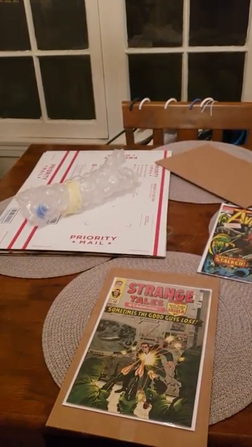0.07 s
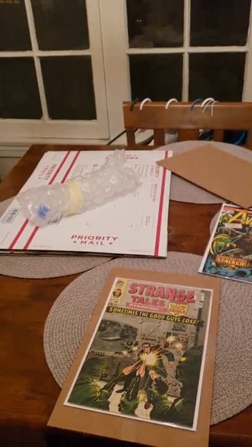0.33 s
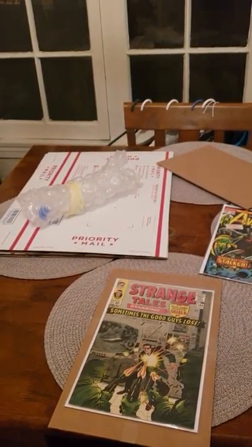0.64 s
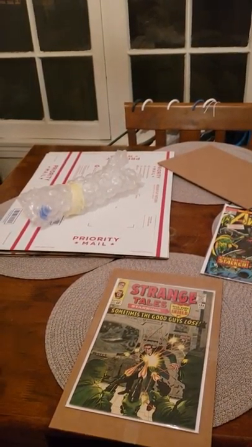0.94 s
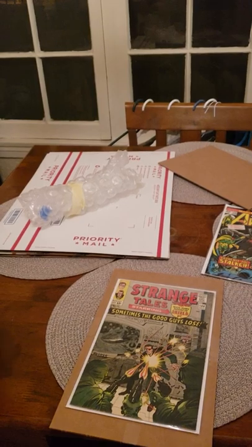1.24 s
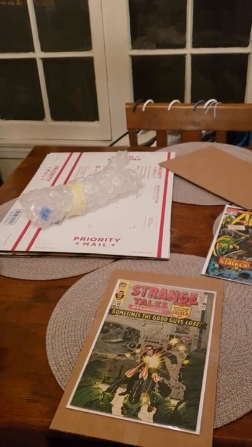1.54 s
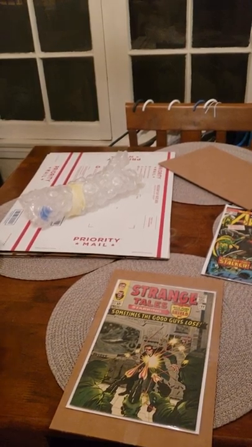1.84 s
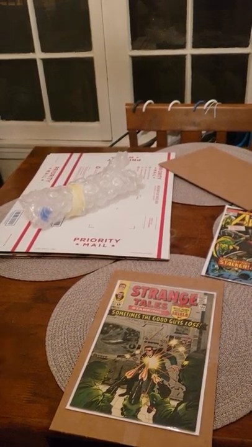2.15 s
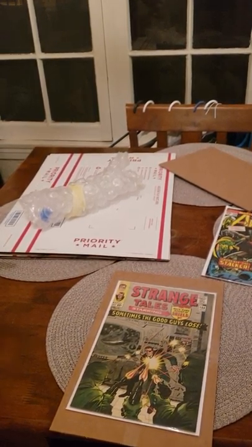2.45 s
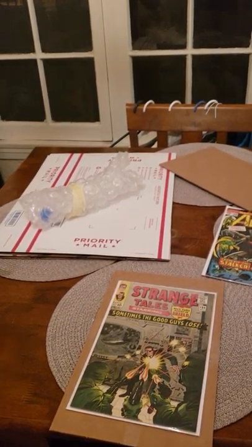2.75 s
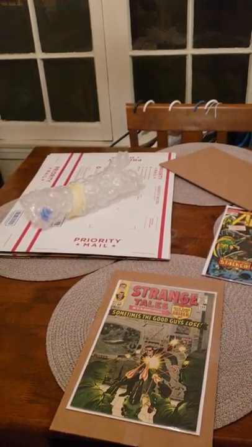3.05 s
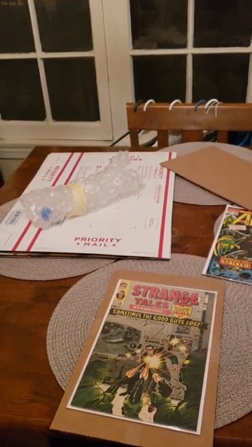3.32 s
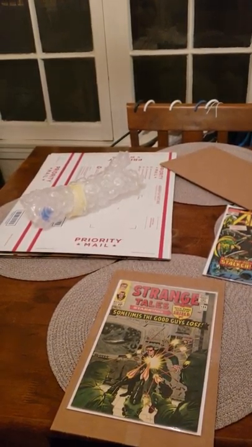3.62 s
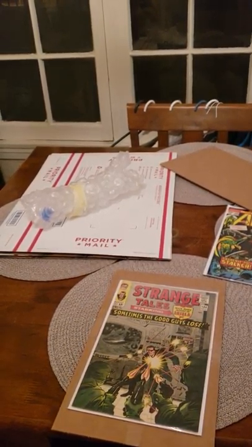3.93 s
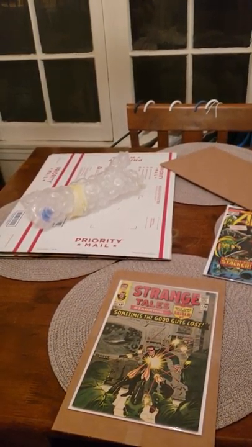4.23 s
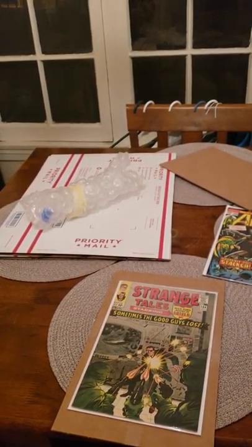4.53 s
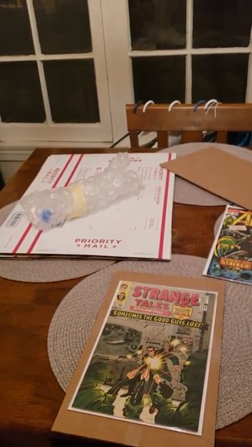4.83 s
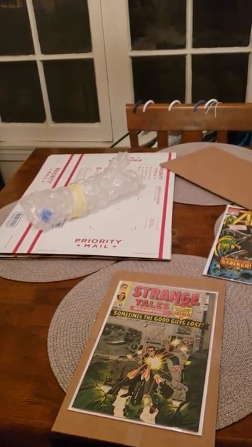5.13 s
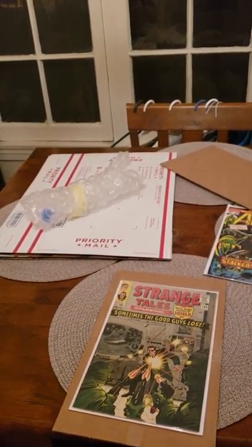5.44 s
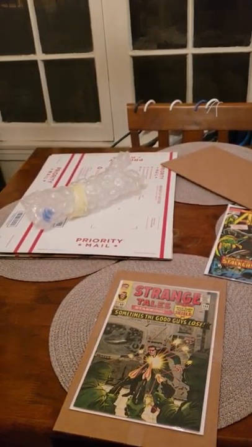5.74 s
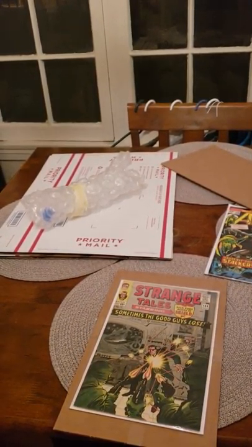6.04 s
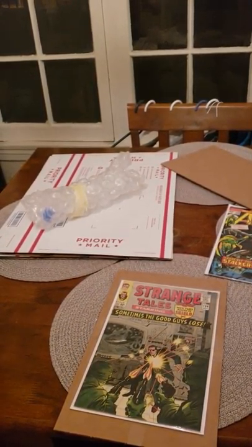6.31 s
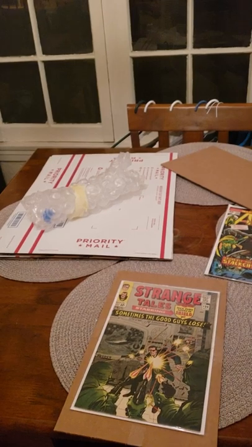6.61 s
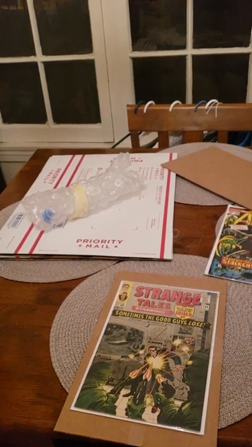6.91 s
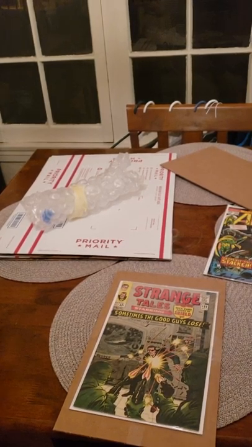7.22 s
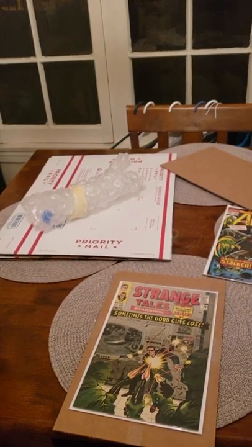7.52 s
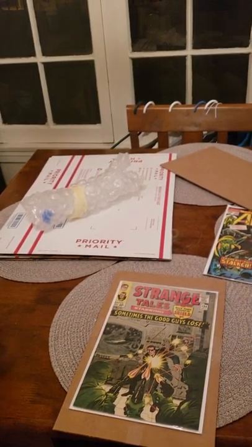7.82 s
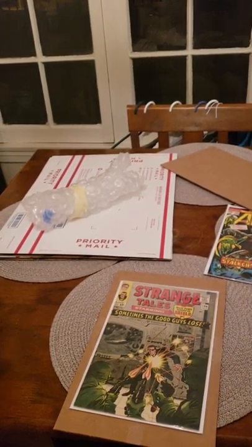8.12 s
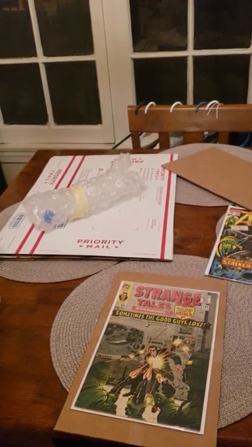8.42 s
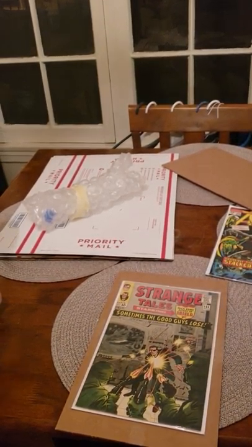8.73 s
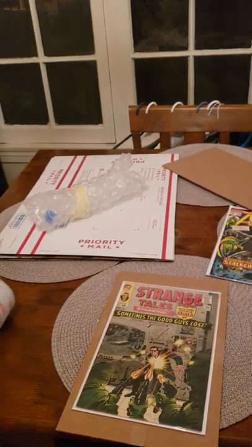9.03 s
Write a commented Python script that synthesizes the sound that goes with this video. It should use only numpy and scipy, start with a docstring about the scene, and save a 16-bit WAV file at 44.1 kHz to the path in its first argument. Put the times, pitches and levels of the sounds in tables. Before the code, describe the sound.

Sharp plastic crackles, soft cardboard knocks and short rips of adhesive tape come from slightly right as a parcel is packed in a small room. The crinkling grows busier, the tape gives a tiny squeak, and one hard pull stands out just past the middle. Afterwards the work dies down to gentle rubbing and a few small snaps. A faint appliance hum and low room noise lie underneath.

```python
"""Taping a parcel at a table in a small, fairly live room, the work a little right of a stereo microphone.
A faint appliance hum and low room noise are there from the start. The tape comes off the roll in short
stick-slip rasps; hands rub over plastic, roll and cardboard bump softly, and the stiff film snaps and
crinkles as it buckles. Past four seconds the taut tape squeaks, and near six comes the hardest pull.
After seven seconds only light strokes and a few small snaps are left over the hum."""
import sys
import numpy as np
from scipy import signal
from scipy.fft import rfft, irfft
from scipy.io import wavfile

SR = 44100
rng = np.random.default_rng(int(sys.argv[2]) if len(sys.argv) > 2 else 0)


def materialize(psi):
    """Save the field psi as 16-bit PCM at rate SR to the path in sys.argv[1].

    A 1-D psi becomes a single channel; in a 2-D psi each row is a channel.
    """
    bounded = np.clip(np.atleast_2d(psi).T, -1, 1)
    quanta = np.round(bounded * 32767).astype(np.int16)
    wavfile.write(sys.argv[1], SR, quanta)


N = 408434
TIME = np.arange(N) / SR

# Low room noise, and a deep thrum under it. Each row: time in seconds, relative level in dB.
RUMBLE_LEVEL = [(0, -63), (.2, -66), (.5, -63), (1.15, -72), (1.8, -62), (2.8, -63), (3.2, -59.5),
                (5.2, -56.5), (6.1, -62), (6.8, -65), (8.4, -60.5), (9.26, -60.5)]
THRUM_LEVEL = [(0, -81), (.38, -62), (.7, -82), (1.4, -80), (2.3, -65), (2.8, -76), (3.8, -64), (4.75, -66),
               (5.05, -57), (5.6, -73), (6.25, -79), (6.55, -64), (6.8, -74), (9.26, -72)]
# Colour of the room noise and of the microphone's hiss. Each row: frequency in Hz, relative level in dB.
RUMBLE_SPECTRUM = [(20, -5), (45, -10.5), (85, -10), (130, 2), (190, -10), (280, -5), (370, 0), (470, -7),
                   (700, -20), (1200, -35), (3000, -40.5)]
HISS_SPECTRUM = [(100, -4.5), (1000, 0), (2000, -4.5), (2900, 2.5), (3500, -5), (5200, 7), (7500, -2),
                 (9500, -9), (11700, 3), (14000, -6), (16000, -8.5)]
# The appliance in the background. Each row: frequency in Hz, level in dB.
HUM_TONES = [(119.5, -74), (366, -74.5)]

# Tape coming off the roll. Each row: start in seconds, length in seconds, level in dB,
# top-octave lift in dB, pitch of the strip in Hz.
TAPE_PULLS = [(0, .012, -39, -1, 5110), (.2795, .013, -18, 6.5, 2940), (.294, .045, -31.5, -3, 2920),
              (1.775, .04, -34, -.5, 5160), (1.99, .012, -31, 2.5, 4940), (3.505, .035, -44, 9, 2800),
              (4.241, .011, -27.5, 0, 3770), (5.053, .035, -35, 4, 5100), (5.864, .034, -19, -.5, 5150),
              (5.896, .022, -14.5, .5, 4850), (5.916, .027, -11.7, 2.5, 3400),
              (5.941, .038, -24.5, 5.5, 4970), (5.974, .045, -39.5, 4, 2800), (6.052, .035, -42, -8, 2670),
              (6.274, .028, -36, 9, 2500), (6.836, .02, -36, 1, 4930), (7.027, .014, -40, -6, 5040)]
# Colour of the peeling strip. Each row: frequency in Hz, relative level in dB.
PEEL_SPECTRUM = [(100, -28), (300, -17), (800, -12.5), (1400, -11.5), (2100, -4), (3000, -3.5),
                 (5300, -2.5), (7200, -8.5), (9000, -4), (12000, -2), (15500, -0.5)]
# Hands passing over the film. Each row: start in seconds, length in seconds, relative level in dB.
HAND_STROKES = [(0, .06, -53), (.13, .5, -65), (1.27, .2, -66), (1.53, .19, -61.5), (1.8, .24, -43.5),
                (2.05, .1, -59), (2.41, .28, -53.5), (2.97, .34, -53.5), (3.31, .46, -50), (3.86, .12, -62),
                (4.07, .13, -58), (4.47, .53, -52.5), (5.06, .2, -47), (5.33, .53, -55.5), (5.98, .07, -43),
                (6.32, .22, -50), (6.79, .4, -62), (7.46, .26, -67), (7.82, .1, -69), (8.1, .18, -61),
                (8.3, .21, -55.5), (8.73, .1, -69), (8.9, .22, -64)]
# Colour of the rubbing. Each row: frequency in Hz, relative level in dB.
RUB_SPECTRUM = [(200, -24), (1200, -8), (2000, -8), (2800, 0), (3600, -6), (5200, 1), (7500, -7.5),
                (10000, -5.5), (15000, -5.5)]
# Knocks and shoves of roll and box. Each row: start in seconds, level in dB, pitch of the hollow in Hz,
# ring of the hollow in dB.
BOX_BUMPS = [(.079, -56.5, 370, 13), (.289, -34.5, 320, 20), (.317, -37, 160, 12), (.333, -45.5, 840, 5),
             (.871, -50.5, 900, -12), (1.939, -50.5, 300, 2), (1.989, -48, 700, 6), (2.055, -50, 500, -1),
             (2.329, -35, 1000, 5), (2.36, -46, 650, 6), (3.47, -55, 650, 7), (4.32, -49, 600, 20),
             (4.352, -43.5, 540, 20), (4.6, -52, 150, 15), (5.014, -43.5, 130, 12), (5.042, -46.5, 650, 13),
             (5.158, -45.5, 550, 6), (5.412, -46, 700, 10.5), (5.5, -51, 600, 10), (5.876, -43.5, 481, 9.5),
             (5.938, -38, 330, 10.5), (6.175, -55, 230, 15), (6.427, -47.5, 300, 0), (6.464, -40, 800, 3),
             (6.595, -48, 450, -13), (6.98, -50, 400, -15), (7.015, -54, 1310, 12)]
# Colour of knocked cardboard. Each row: frequency in Hz, relative level in dB.
CARDBOARD_SPECTRUM = [(40, -13.5), (110, 3), (300, 2.5), (700, -6), (1400, -8), (2200, -5.5), (4000, -24.5),
                      (10000, -42.5)]
# Clear snaps of buckling film. Each row: start in seconds, relative energy in dB,
# tilt from flex towards tick in dB, pitch of the flex in Hz.
CREASE_SNAPS = [(.158, -18, 8, 5300), (.2875, 5, 4.5, 2940), (.3236, -2, 6, 2920), (.3379, 0, 2, 3000),
                (.6996, -31, -8, 5200), (.8494, -23.5, 5, 2750), (.8546, -19.5, -12, 5200),
                (1.598, -25, -4, 5360), (1.6848, -14, 2, 6000), (1.7045, -6.5, 5.5, 5300),
                (1.7685, -4.5, 7, 2750), (1.7973, -7.5, 5, 4900), (1.923, -10, 0, 5750),
                (1.9858, -5.5, 5.5, 2900), (1.9921, -4, 11, 5000), (2.1742, -24, -9, 2800),
                (2.3071, -6.5, 2, 4870), (2.3133, -1, 6, 5200), (2.5848, -25, -15, 2800),
                (2.624, -23.5, 4, 5630), (2.6806, -17, -14, 2800), (2.7017, -21, -10, 3000),
                (3.0514, -18, -15, 2750), (3.1944, -18, -14, 2800), (3.2773, -15.5, -15, 2750),
                (3.3235, -20, -16, 4800), (3.3508, -6.5, 5, 3000), (3.429, -14, 3, 5300),
                (3.4517, -18, -4, 2900), (3.4731, 2.5, -1, 2800), (3.5067, 1, -2, 2900),
                (3.5145, 0, -3, 5100), (3.5344, -10, 5, 5500), (3.5636, 4.5, 4, 2720), (3.58, -1, 1, 5140),
                (3.6147, -6, 2, 2800), (3.644, 1.5, 5, 2800), (3.683, -6, 10, 3000),
                (3.7434, -8.5, 9, 4900), (3.749, -5, 2.5, 2830), (3.777, -18, -15, 2800),
                (3.956, -23.5, 7.5, 3100), (4.1325, -9, 5, 5500), (4.1847, -15.5, 3, 3000),
                (4.2106, -17.5, -11, 2800), (4.2215, -8, -11, 2900), (4.256, -11, -11, 2800),
                (4.2918, -10.5, -4, 4830), (4.3075, -7, -9, 2750), (4.3568, -13, -7, 2800),
                (4.4978, -20.5, -15, 3000), (4.5261, -10.5, -9, 2800), (4.61, -18.5, -14, 5240),
                (4.7063, -20, -3, 2600), (4.782, -8.5, 3, 5400), (4.7905, -5, 4, 5700),
                (4.891, -7, -10, 4900), (4.9111, -2, 2, 4800), (4.9559, -9.5, -4, 5000),
                (4.9847, -15.5, -18, 4000), (5.0405, -1, -2, 5000), (5.0495, -3, 1, 4950),
                (5.0636, 2.5, -1, 6050), (5.078, -2, 7, 5150), (5.09, -1, 4, 5200), (5.159, -3, 6, 5000),
                (5.2011, -10, -1, 5400), (5.2185, -6.5, .6, 5500), (5.3732, -13, -5.5, 5400),
                (5.4057, -15.5, .6, 2900), (5.4161, -4, -4, 3050), (5.469, -6.5, -12.5, 3700),
                (5.4945, -5, -1, 5300), (5.5038, 2, -4, 3340), (5.5618, -13.5, 13.5, 4400),
                (5.6204, -15, -21, 3780), (5.8212, -23, -12, 2500), (5.8779, 9.5, 0, 5500),
                (5.9883, -3.5, 11, 3700), (6.0906, -10.5, -4, 2300), (6.162, -8, 1, 5200),
                (6.18, -.5, 0, 4580), (6.2741, -6, 9, 5400), (6.295, -6, 2, 5400), (6.352, -11.5, 7, 2470),
                (6.3961, -6.5, -4, 4830), (6.4581, -13, -2, 5500), (6.5445, -10, 0, 5500),
                (6.603, -9.5, -2, 3000), (6.8284, -26, 1, 5900), (6.8435, -3, -6, 5200),
                (6.8561, -6, -6, 4500), (6.8829, -4, 3, 5370), (6.973, -20, -2, 5300),
                (7.0151, -14, -3.5, 5300), (7.0407, -9.5, -5, 4930), (8.1763, -22.5, 0, 5300),
                (8.2076, -17.5, -2, 5000), (8.5011, -22.5, -4, 2800), (8.7448, -27, -3, 3000),
                (8.9602, -26, -6, 5000), (9.0066, -24, -5, 4800)]
# Colour of a snap's ringing flex and its bright tick. Each row: frequency in Hz, relative level in dB.
FLEX_SPECTRUM = [(100, -30), (500, -16.5), (1300, -16), (2000, -7), (2800, 1.5), (3900, -2), (5400, -1),
                 (7000, -9), (10000, -20), (16000, -30)]
TICK_SPECTRUM = [(100, -44.5), (2500, -29), (6500, -11), (8500, -5), (11000, 1), (15000, 1), (17000, -7)]
# Taut tape squeaking. Each row: start in seconds, length in seconds, level in dB, first pitch in Hz,
# last pitch in Hz, octave over fundamental in dB.
TAPE_SQUEAKS = [(4.241, 0.0128, -25.5, 2180, 1860, 0), (4.26, 0.019, -45, 2140, 2060, -18),
                (4.301, .009, -31.5, 2570, 2770, -11)]

# How long the room rings. Each row: frequency in Hz, seconds to fall by 60 dB.
ROOM_DECAY = [(100, .5), (500, 0.53), (2000, 0.3952), (5000, 0.355), (10000, 0.38), (16000, 0.08)]
# Colour of the reflections at the microphone. Each row: frequency in Hz, gain in dB.
ROOM_SPECTRUM = [(100, -3.5), (1000, 2.5), (2800, -3), (5200, 2), (7500, -1.5), (11000, -4.5), (16000, -1)]
# Direct sound at the two microphone ports. Each row: frequency in Hz, left minus right in dB.
PORT_BALANCE = [(200, 0.5), (1500, -1), (2900, -3.5), (5000, -4.5), (7500, -2), (11000, -2), (15000, 1.5)]

STROKE_ATTACK_S, STROKE_RELEASE_S = .035, .05


def from_db(db):
    """Decibels to gain."""
    return 10 ** (np.asarray(db) / 20)


def rms_one(x):
    """Scale to rms 1."""
    return x / np.sqrt(np.mean(x ** 2) + 1e-20)


def energy_one(x):
    """Scale to energy 1 per channel."""
    return rms_one(x) / np.sqrt(x.shape[-1])


def at_hz(points, hz):
    """Read a table on a log-frequency axis."""
    f, value = np.transpose(points)
    return np.interp(np.log(np.maximum(hz, 1)), np.log(f), value)


def in_time(rows):
    """Read a curve at every sample."""
    return np.interp(TIME, *np.transpose(rows))


def add(out, start_s, sound):
    """Mix a sound in at a time."""
    at = max(round(start_s * SR), 0)
    out[..., at:at + sound.shape[-1]] += sound[..., :max(N - at, 0)]


def response(spectrum, size=2048):
    """Causal (minimum-phase) impulse response of a spectrum."""
    hz = np.arange(size // 2 + 1) * SR / size
    cepstrum = irfft(np.log(from_db(at_hz(spectrum, hz))))
    cepstrum[1:size // 2] *= 2
    cepstrum[size // 2 + 1:] = 0
    return irfft(np.exp(rfft(cepstrum)))[:size // 2]


def through(x, impulse):
    """Filter both channels with an impulse response."""
    return signal.fftconvolve(x, np.atleast_2d(impulse), axes=-1)[:, :x.shape[-1]]


def resonance(x, hz, width_hz):
    """Two-pole resonance with gain 1 at its peak."""
    r = np.exp(-np.pi * width_hz / SR)
    poles = [1, -2 * r * np.cos(2 * np.pi * hz / SR), r * r]
    return signal.lfilter(np.array([1, 0, -1]) * (1 - r * r) / 2, poles, x)


def stereo_noise(length, alike):
    """White noise whose two channels have the correlation `alike`."""
    mid, side = rng.standard_normal((2, length))
    return np.sqrt(1 + alike) * mid + np.sqrt(1 - alike) * np.array([side, -side])


def grains(length, per_s, spread_db, decay_s):
    """Amplitude of a run of uneven grains, each dying quickly."""
    onsets = rng.random(length) < per_s / SR
    sizes = onsets * from_db(spread_db * np.clip(rng.standard_normal(length), -2, 2))
    return np.sqrt(signal.lfilter([1], [1, -np.exp(-2 / (decay_s * SR))], sizes ** 2 + 1e-12))


def room_tone(thrum_hz=58, thrum_width_hz=50, thrum_trim_db=-2, hiss_db=-74.5):
    """Behind the work: low room noise, a deep thrum, microphone hiss and the appliance's steady hum."""
    rumble = through(stereo_noise(N, alike=.94), response(RUMBLE_SPECTRUM, size=8192))
    rumble = from_db(in_time(RUMBLE_LEVEL)) * rms_one(rumble)
    thrum = stereo_noise(N, alike=1)
    for _ in range(2):
        thrum = resonance(thrum, thrum_hz, thrum_width_hz)
    thrum = from_db(in_time(THRUM_LEVEL) + thrum_trim_db) * rms_one(thrum)
    hiss = from_db(hiss_db) * rms_one(through(stereo_noise(N, alike=.1), response(HISS_SPECTRUM)))
    hum = sum(from_db(db) * np.sqrt(2) * np.sin(2 * np.pi * (hz * TIME + rng.random()))
              for hz, db in HUM_TONES)
    return rumble + thrum + hiss + hum


def tape_pulls(slips_per_s=1150, middling_db=-32, doubling_db=22, release_s=.002, ring_db=6):
    """Glue lets go in stick-slip jerks that shake the taut strip, whose free length sets its pitch."""
    out, t = np.zeros((2, N)), np.arange(SR // 10) / SR
    strip = response(PEEL_SPECTRUM)
    top_octave = signal.butter(1, 8000, "high", fs=SR)
    for start_s, length_s, db, top_db, hz in TAPE_PULLS:
        per_s = slips_per_s * 2 ** ((db - middling_db) / doubling_db)   # a harder pull slips faster
        noise = stereo_noise(len(t), alike=.55)
        jerks = noise * (grains(len(t), per_s, spread_db=2.4, decay_s=.00021) + .08)
        rasp = through(jerks, strip)
        lift = (from_db(top_db) - 1) * signal.lfilter(*top_octave, rasp)
        ring = from_db(ring_db) * resonance(rasp, hz, width_hz=800)
        attack = 1 - np.exp(-t / (.1 * length_s))
        release = np.exp(-np.maximum(t - length_s, 0) / release_s)
        add(out, start_s, from_db(db) * rms_one(rasp + lift + ring) * attack * release)
    return out


def hand_rubbing(resting_db=-78, stroke_trim_db=-5):
    """Film crinkles finely under each stroke; in between, the resting hands still brush it."""
    pressure, t = np.full(N, from_db(resting_db)), np.arange(SR) / SR
    for start_s, length_s, db in HAND_STROKES:
        swell = 1 - np.exp(-t / STROKE_ATTACK_S)
        fade = np.exp(-np.maximum(t - length_s, 0) / STROKE_RELEASE_S)
        add(pressure, start_s, from_db(db + stroke_trim_db) * swell * fade)
    friction = stereo_noise(N, alike=.5) * (grains(N, per_s=430, spread_db=4, decay_s=.00046) + .5)
    return pressure * rms_one(through(friction, response(RUB_SPECTRUM)))


def cardboard_bumps(rise_s=.00094, t60_s=.15):
    """Soft contacts excite the damped cardboard and the hollow under it."""
    out, t = np.zeros((2, N)), np.arange(SR // 2) / SR
    board = response(CARDBOARD_SPECTRUM)
    envelope = (1 - np.exp(-t / rise_s)) * from_db(-60 * t / t60_s)
    for start_s, db, hz, hollow_db in BOX_BUMPS:
        bass_cut = signal.butter(1, .17 * hz, "high", fs=SR)   # a small, high hollow gives little bass
        body = signal.lfilter(*bass_cut, through(stereo_noise(len(t), alike=.85), board))
        hollow = from_db(hollow_db) * resonance(body, hz, width_hz=.48 * hz)
        add(out, start_s, from_db(db) * rms_one(body + hollow) * envelope)
    return out


def film_snaps(creases, tick_s=.00045, flex_s=.00099, tick_db=2, flex_db=-1, ring_db=7.5,
               wide_panel_hz=2800, grain_db=-12.5, fizz_s=.002, trail_s=.0042):
    """A crease flips with a bright tick and a brief ring of the film round it."""
    out, t = np.zeros((2, N)), np.arange(-220, 620) / SR   # the flip is at t = 0
    flex_body, tick_body = response(FLEX_SPECTRUM, size=512), response(TICK_SPECTRUM, size=512)
    tick_decay = (t > 0) * np.exp(-np.abs(t) / tick_s)
    flex_decay = (t > 0) * np.exp(-np.abs(t) / flex_s)
    # a faint fizz leads into each snap, and tiny cracks trail it
    grain_envelope = from_db(grain_db) * np.exp(-np.abs(t) / np.where(t < 0, fizz_s, trail_s))
    for start_s, db, tilt_db, hz in creases:
        grain = grain_envelope * grains(len(t), per_s=1200, spread_db=9, decay_s=.00034)
        tick = through(stereo_noise(len(t), alike=.35) * (grain + tick_decay), tick_body)
        flex = through(stereo_noise(len(t), alike=.65) * (grain + flex_decay), flex_body)
        # smaller, higher panels of film ring more weakly and briefly
        ring = from_db(ring_db) * wide_panel_hz / hz * resonance(flex, hz, width_hz=.15 * hz)
        tilt = from_db(tilt_db)
        snap = from_db(flex_db) * energy_one(flex + ring) + from_db(tick_db) * tilt * energy_one(tick)
        add(out, start_s + t[0], from_db(db) * snap / np.hypot(1, tilt))
    return out


def faint_creases(per_s=15, most_per_stroke=16, pitch_range_hz=(2600, 5600)):
    """Each stroke flips creases at random, stronger under a firmer hand; rows as in CREASE_SNAPS."""
    rows = []
    for start_s, length_s, stroke_db in HAND_STROKES:
        for k, (when, size, brightness, pitch) in enumerate(rng.random((most_per_stroke, 4))):
            after_s = STROKE_ATTACK_S + (k + when) / per_s
            if after_s < length_s:
                db = stroke_db + np.interp(size, [0, 1], [21, 27])
                tilt_db = np.interp(brightness, [0, 1], [-17, -1])
                rows.append((start_s + after_s, db, tilt_db, np.interp(pitch, [0, 1], pitch_range_hz)))
    return rows


def tape_squeaks(jitter=.25, third_db=-16):
    """Under tension the slips lock into a regular cycle for a moment."""
    out, t = np.zeros((2, N)), np.arange(SR // 20) / SR
    for start_s, length_s, db, first_hz, last_hz, octave_db in TAPE_SQUEAKS:
        progress = np.clip(t / length_s, 0, 1)
        glide_hz = first_hz + (last_hz - first_hz) * progress
        hz = glide_hz * (1 + jitter * rng.standard_normal(len(t)))
        phase = 2 * np.pi * np.cumsum(hz) / SR
        overtones = from_db(octave_db) * np.sin(2 * phase) + from_db(third_db) * np.sin(3 * phase)
        add(out, start_s, from_db(db) * rms_one(np.sin(phase) + overtones) * np.sin(np.pi * progress))
    return out


def direct_path(x):
    """Straight from table to microphone: mostly louder at the right port, a sample later at the left."""
    left = response([(hz, db / 2) for hz, db in PORT_BALANCE], size=256)
    right = response([(hz, -db / 2) for hz, db in PORT_BALANCE], size=256)
    return through(x, np.array([np.roll(left, 1), right]))


def room_reflections(x, build_s=.003, alike_below_hz=520):
    """Diffuse reflections die at their own pace in each band; long waves reach both ports alike."""
    t, tail = np.arange(int(.7 * SR)) / SR, 0
    build_up = 1 - np.exp(-(t / build_s) ** 2)
    edges_hz = np.geomspace(60, 17000, 15)
    for low, high in zip(edges_hz, edges_hz[1:]):
        hz = np.sqrt(low * high)
        noise = stereo_noise(len(t), alike=1 / (1 + (hz / alike_below_hz) ** 6))
        band = signal.sosfilt(signal.butter(2, [low, high], "band", fs=SR, output="sos"), noise)
        band = energy_one(band * build_up * from_db(-60 * t / at_hz(ROOM_DECAY, hz)))
        tail = tail + band * from_db(at_hz(ROOM_SPECTRUM, hz)) * np.sqrt(2 * (high - low) / SR)
    return through(x, tail)


def scene(film_send_db=-1.7, tape_send_db=-1.8, squeak_send_db=-4):
    """The work at the table reaches the microphone directly and off the walls, over the room tone."""
    tape, squeaks, bumps, background = tape_pulls(), tape_squeaks(), cardboard_bumps(), room_tone()
    film = hand_rubbing() + film_snaps(CREASE_SNAPS + faint_creases())
    to_room = (from_db(film_send_db) * film + from_db(tape_send_db) * tape
               + from_db(squeak_send_db) * squeaks + bumps)
    return direct_path(film + tape + squeaks + bumps) + room_reflections(to_room) + background


def record(dry, cutoff_hz=16100):
    """The microphone signal is clipped at full scale and its top cut steeply."""
    top_cut = signal.ellip(10, .1, 70, cutoff_hz, fs=SR, output="sos")
    return signal.sosfilt(top_cut, np.clip(dry, -1, 1))


dry = scene()
out = record(dry)
materialize(out)
```